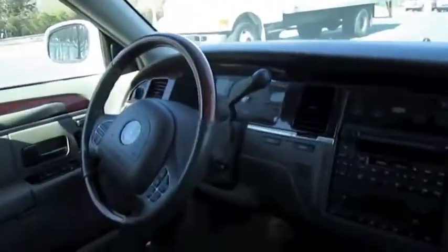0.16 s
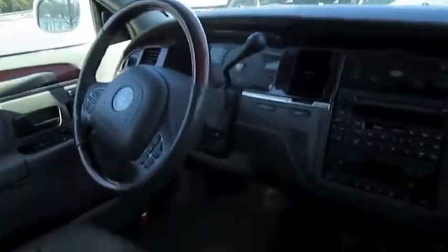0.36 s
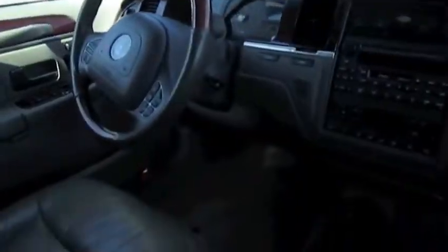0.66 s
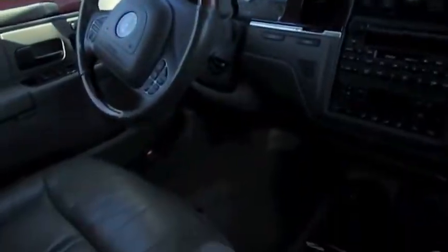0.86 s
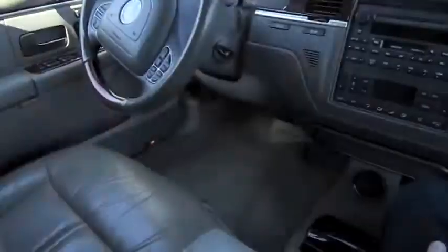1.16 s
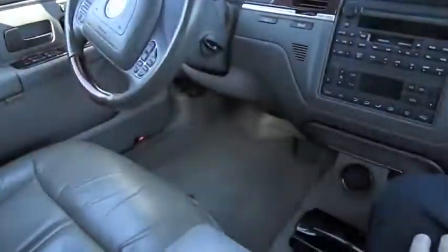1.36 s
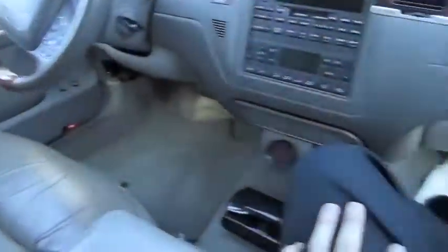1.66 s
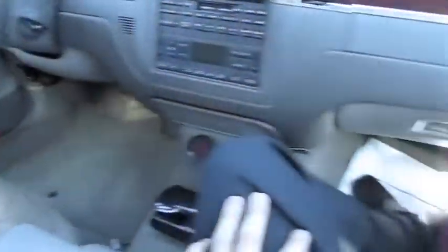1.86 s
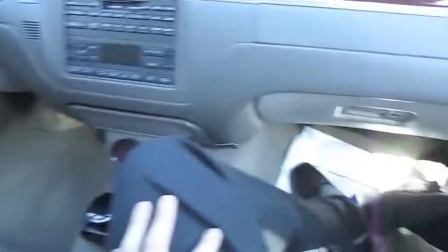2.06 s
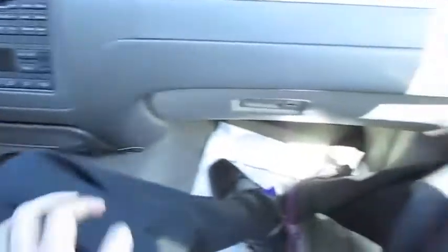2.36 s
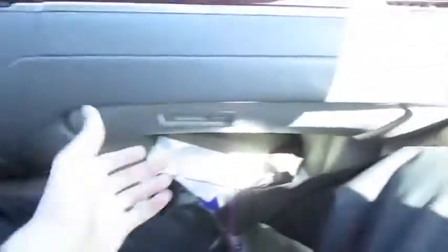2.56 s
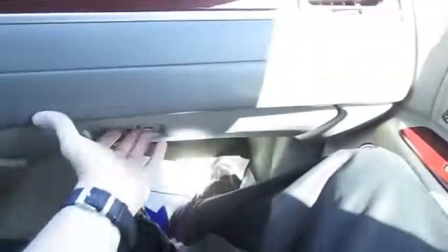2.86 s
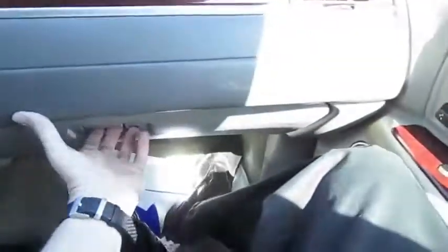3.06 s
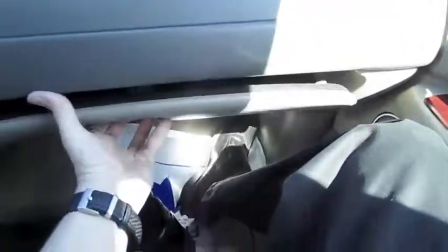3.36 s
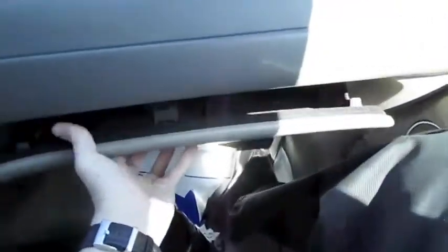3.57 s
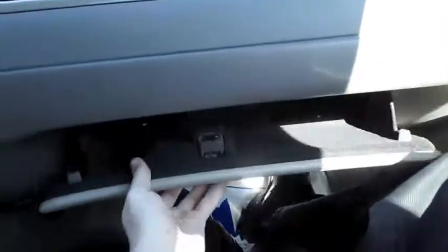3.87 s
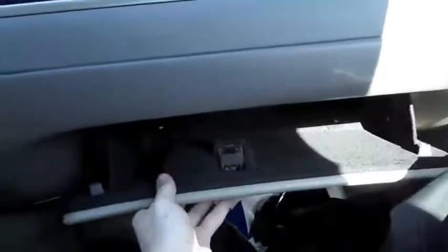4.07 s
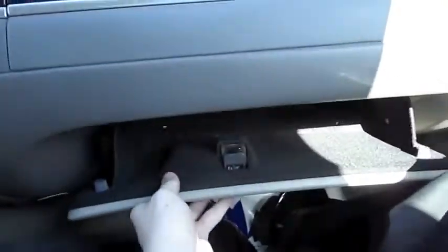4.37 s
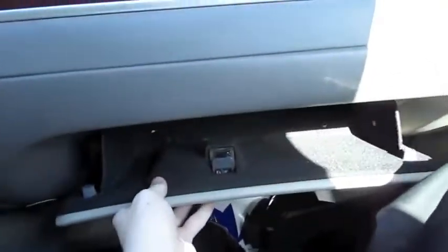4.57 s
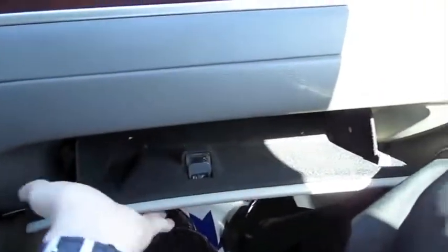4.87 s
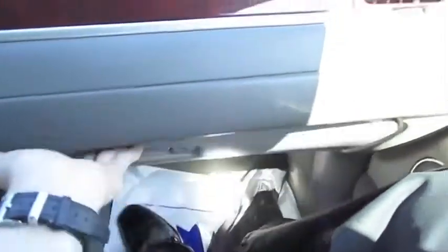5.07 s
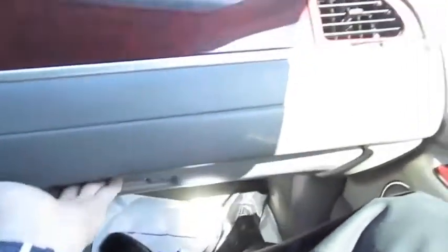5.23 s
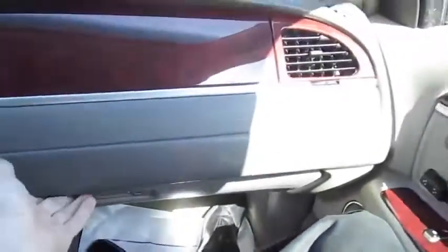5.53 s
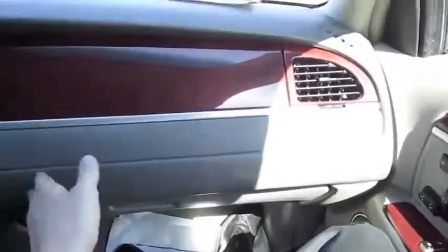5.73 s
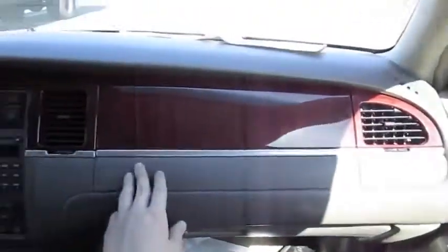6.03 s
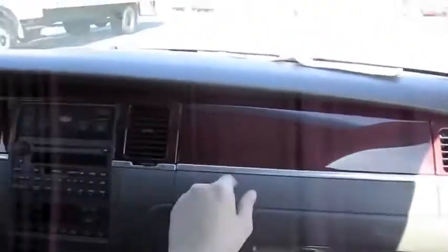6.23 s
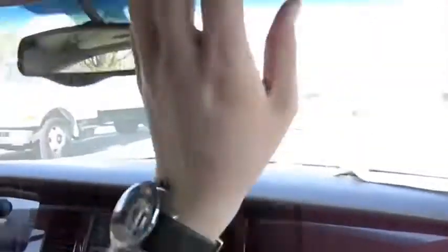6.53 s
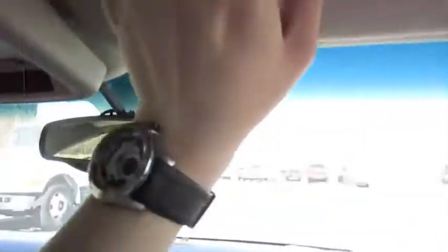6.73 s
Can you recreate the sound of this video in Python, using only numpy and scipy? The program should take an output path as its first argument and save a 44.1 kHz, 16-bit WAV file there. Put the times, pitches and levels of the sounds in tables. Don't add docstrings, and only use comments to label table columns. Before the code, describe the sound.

Close hand-held microphone in a parked car: constant deep hum, two hard clicks, a blink of near silence, sleeve rustle and soft bumps. A scratchy stick-slip scrape rises into a hard plastic pop as the glovebox opens. Small trim ticks and palm rubbing lead to the loudest event, a boomy slam that shakes the dashboard. The background ducks, then recovers beneath dry strap creaks and handling bumps.

```python
import sys
import numpy as np
from scipy import signal
from scipy.fft import rfft, irfft
from scipy.io import wavfile

SR = 44100
rng = np.random.default_rng(int(sys.argv[2]) if len(sys.argv) > 2 else 0)


def convert_level_to_amplitude(level_db):
    exponent = np.asarray(level_db, float) / 20
    return 10 ** exponent


def output_pcm(signal):
    pcm = np.clip(np.atleast_2d(signal).T, -1, 1) * 32767
    wavfile.write(sys.argv[1], SR, np.round(pcm).astype(np.int16))


N = 304290

# [time_s, level_db, octave_rel_db]
DRONE_LEVELS = [(0.05, -26, -16.5), (0.2, -24, -16.5), (0.5, -27, -12), (0.8, -26, -15.5),
                (0.97, -29.5, -13.5), (1.2, -30, -14.5), (1.36, -27.5, -38), (1.8, -28.5, -22),
                (2.47, -27, -23.5), (2.9, -28.5, -21), (3.27, -29.5, -19), (4.0, -29, -21),
                (4.7, -27.5, -19.5), (5.1, -26.5, -23), (5.6, -30, -8.5), (6.15, -26, -23.5),
                (6.6, -29.5, -15.5), (6.9, -30.5, -15)]
# [time_s, firing_hz]
MOTOR_SPEED = [(0, 72.6), (1.24, 72.5), (1.3, 71.9), (2.4, 71.9), (3.3, 71.2), (5, 70.7), (6, 70.1),
               (6.9, 70)]
# [ratio_to_firing_hz, level_rel_db]
SIDE_BANDS = [(0.502, -36.5), (1.5, -36.5), (2.368, -31), (3.05, -32), (4, -43), (4.65, -36)]
SIDE_FADE_DB_PER_S = -2

# [rest_db, effort_share, ducking_share, jolt_db, jolt_t60_s]
CABIN_LAYERS = [
    (-49, .1, 0.28, -29, .5),
    (-54.5, .2, 1, -31.5, 0.35),
    (-60.5, 0.88, 1, -43, 0.36),
    (-66.5, 0.6, 0.93, -60, 0.33),
]
# [freq_hz, level_db]
SWAY_SPECTRUM = [(10, -21), (20, 14.5), (35, 4), (50, 19), (60, -1.5), (80, -19)]
# [freq_hz, level_db]
RUMBLE_SPECTRUM = [(60, -27), (90, 12), (120, 10.5), (170, 5), (300, -1), (500, -5.5), (1000, -20.5)]
# [freq_hz, level_db]
CLOTH_SPECTRUM = [(250, -17), (500, -1), (900, -0.5), (1500, -4.5), (2500, -8.5), (4000, -14.5),
                  (7000, -39)]
# [freq_hz, level_db]
SWISH_SPECTRUM = [(1500, -6.5), (3000, -1), (5000, 0.5), (7000, -2), (9000, -4.5), (12000, -9),
                  (15000, -12.5), (17000, -23.5)]
# [time_s, effort_db]
HAND_EFFORT = [(0, 0.5), (1.35, 0.5), (1.66, 9), (2.3, 9), (2.57, 7.5), (2.87, 13), (3.0, 11), (3.4, 11.5),
               (3.7, 4), (4.08, 8), (4.3, 1.5), (4.55, 2.5), (4.86, 0.5), (5.1, 4.5), (5.8, 3.5), (6.27, 4),
               (6.76, 11.5), (6.9, 7)]
# [start_s, depth_db, fall_s, hold_s, recovery_s]
DUCKS = [
    (3.275, -7.5, 0.097, 0.17, 0.21),
    (5.14, -13, 0.035, 0.32, 0.59),
]

# [start_s, peak_db, contact_ring_db]
SWITCH_CLICKS = [
    (0.5815, -10.5, -34),
    (0.8262, -12.5, -11.5),
]
# [freq_hz, level_db, t60_s]
SWITCH_MODES = [(1600, 3, 0.015), (2800, 12, 0.0059), (3120, 9, 0.003), (5060, 11.5, 0.0042),
                (5600, 9.5, 0.0056), (6980, 0.5, 0.0057)]
# [freq_hz, level_db, t60_s]
CONTACT_MODES = [(7940, 12.5, 0.0028), (10360, 4.5, 0.0047), (13800, 2, 0.0038)]
CASING_ECHO_GAIN, CASING_ECHO_S = 0.8, 0.000242

# [start_s, length_s, peak_db, centre_hz, breadth_octaves]
STROKES = [(2.24, 0.3, -56, 7300, 1.3), (2.47, 0.083, -49, 4900, 1.16), (5.02, 0.085, -62, 11200, 0.49),
           (5.09, 0.048, -61.5, 9000, .9), (5.06, 0.042, -56.5, 2880, 0.55), (5.066, 0.1, -50, 900, 0.91),
           (6.69, 0.11, -56.5, 7260, .43), (6.77, 0.14, -51.5, 6800, 0.76)]
# [start_s, length_s, peak_db, centre_hz, breadth_octaves]
RUBS = [(1.33, 0.31, -51.5, 228, 0.69), (3.314, 0.056, -36.5, 190, 0.6), (4.186, 0.048, -51, 580, .6),
        (4.299, 0.075, -57, 640, 0.39), (4.424, .09, -52, 605, 0.87), (4.514, 0.095, -51.5, 600, 1),
        (4.917, 0.041, -50, 600, 0.94), (6.498, 0.077, -53, 700, 1.5), (6.599, 0.33, -52.5, 262, 0.88)]
# [start_s, length_s, peak_db, centre_hz, breadth_octaves]
NOISE_BURSTS = [(3.187, .016, -46, 11000, .7), (3.205, 0.019, -46, 11000, 0.64), (3.288, 0.019, -46, 8000, .7),
                (5.196, 0.042, -48, 1100, 0.8), (5.266, 0.029, -51.5, 1500, 0.81),
                (6.213, 0.013, -44.5, 1310, 1), (3.745, .012, -60, 9000, .8), (4.135, 0.044, -62, 8000, .8),
                (3.25, .02, -56, 9000, .8), (3.315, .02, -58, 5000, .9), (3.43, .012, -56, 4000, .6),
                (6.518, .012, -52, 5000, .9), (6.21, .008, -56, 4500, .6)]
STROKE_SKEW, STROKE_SOFTNESS, SINK_OCTAVES = 0.99, 0.74, 0.27

# [start_s, length_s, level_db, from_hz, to_hz]
OUTSIDE_ENGINE = (1.4, 0.65, -43.5, 118, 107.5)

# [start_s, peak_db, ring_hz]
KNOCKS = [(2.036, -30.5, 346), (2.365, -31, 376), (2.465, -32.5, 334), (2.746, -38, 910),
          (2.999, -32, 1450), (3.212, -26, 1300), (3.418, -34, 1250), (3.431, -19.5, 523),
          (3.434, -28.5, 785), (3.439, -53, 1100), (3.773, -33, 553), (4.13, -20.5, 746), (4.21, -37, 510),
          (4.93, -38, 725), (3.351, -38, 203), (5.228, -31, 298), (5.682, -45, 338), (5.966, -32, 353),
          (6.213, -34.5, 800), (6.422, -45, 503), (6.541, -35, 366), (6.73, -33.5, 337)]
KNOCK_CYCLES, KNOCK_MIN_T60_S = 15.3, 0.044

# [time_s, pressure_db]
DRAG_PRESSURE = [(2.92, -55), (2.971, -48), (3.02, -39), (3.05, -39), (3.1, -36), (3.15, -37.5),
                 (3.171, -38), (3.185, -54.5)]
# [freq_hz, width_hz, level_db]
LATCH_RESONANCES = [(562, 140, -35.5), (853, 49, -1.5), (1260, 150, -14.5), (1520, 680, 6.5),
                    (2000, 400, 8), (2445, 190, -7), (3260, 300, -8.5)]
# [freq_hz, level_db]
EDGE_SPECTRUM = [(1200, -30), (2900, 7.5), (3800, 3.5), (4800, -3), (5800, -3.5), (7000, -7), (10000, -7),
                 (16000, -20)]
# [peak_s, level_db, half_length_s]
LAST_SLIPS = [
    (3.195, -43, 0.0048),
    (3.217, -34, 0.015),
    (3.263, -37.5, 0.0056),
]
RASP_DB, RASP_DB_PER_S = -12.5, 39.5
BENT_STRETCH, BEND_FROM_S, BEND_TO_S = 1.3, 3.08, 3.13

# [start_s, length_s, level_db, from_hz, to_hz]
CHATTER = [(3.02, 0.053, -46, 2100, 2070), (3.064, 0.036, -38, 2080, 2090), (3.078, 0.017, -44, 790, 930),
           (3.05, .04, -47, 1350, 1600), (3.097, 0.045, -43, 1440, 1420), (3.11, 0.023, -40, 2150, 2200),
           (3.128, 0.025, -40, 1530, 1300), (3.13, 0.019, -42, 1600, 2500), (3.145, 0.032, -41, 2700, 1900),
           (3.092, 0.026, -47, 3750, 3620), (3.12, 0.036, -46, 4200, 3420), (3.122, 0.05, -52, 5850, 5800),
           (3.162, 0.023, -43, 1700, 1400), (3.188, .014, -47, 4760, 3780), (3.188, 0.045, -54, 5850, 5400),
           (3.206, 0.021, -52, 4300, 4300), (3.249, .016, -52, 4250, 4200), (3.256, .01, -49, 5700, 5200),
           (3.256, .009, -42, 1500, 1270), (3.194, 0.013, -47, 1940, 2080)]
CHATTER_WIDTH_HZ, CHATTER_SLIPS_PER_S = 420, 2500

# [start_s, peak_db, ring_hz]
TICKS = [(3.0847, -34, 2140), (3.2105, -27, 1400), (3.217, -26, 1520), (3.261, -28, 1520),
         (3.369, -52, 1930), (3.4295, -33, 1940), (3.67, -36.5, 1990), (3.927, -35, 2100),
         (3.9796, -46, 2430), (4.0213, -55, 1410), (4.0733, -47, 1420), (4.138, -43, 1300),
         (4.17, -46, 1450), (5.197, -40, 1580), (5.2588, -58, 4160), (6.2118, -32, 1460),
         (6.5226, -44, 3360), (6.709, -41, 1260)]
# [start_s, peak_db, ring_hz]
CRACKS = [(3.2505, -34, 1090), (3.599, -48.5, 1550), (3.634, -53, 1360), (3.7758, -50, 2020),
          (4.4687, -46, 1170), (4.5415, -49, 1230), (4.5723, -47, 1250), (4.9825, -49.5, 4700)]
TICK_EDGE_DB, CRACK_EDGE_DB = -12.5, -4
FAINT_T60_S, T60_DB_PER_DB = 0.027, -0.37

# [start_s, peak_db, freq_hz, t60_s]
PINGS = [(3.296, -29, 3380, .03), (3.299, -30, 1880, 0.045), (3.312, -35, 1600, 0.027),
         (3.312, -35, 2880, 0.033), (3.367, -48, 2000, .02), (3.2165, -27, 1520, .03),
         (3.251, -33, 1070, .02), (3.284, -22, 205, .12), (3.4295, -30, 1950, .035), (4.13, -33, 520, .05),
         (4.131, -38, 1300, .03), (3.431, -41, 4900, .02), (3.431, -35, 2650, 0.017),
         (3.67, -47, 6070, .015), (3.6705, -46, 8800, 0.018), (3.776, -50, 5900, .025),
         (3.776, -48, 3900, .02), (3.704, -54, 5200, .025), (3.809, -52, 4700, .02),
         (3.927, -47, 4000, .03), (3.926, -48, 7300, .02), (4.136, -50, 5200, .03), (4.074, -54, 5500, .02),
         (5.139, -18.5, 2140, .03), (5.14, -23, 5700, .06), (5.149, -32.5, 4790, 0.068),
         (5.151, -26, 1218, 0.1), (5.152, -22, 3340, .06), (5.165, -27, 675, 0.13),
         (5.268, -50, 6300, .015), (5.2685, -42, 1500, .03), (5.964, -45, 1400, 0.024),
         (6.5215, -41, 3450, .02), (6.237, -48, 2400, .02), (6.131, -43, 2300, .02),
         (6.0783, -45, 2380, .02), (6.104, -45, 1800, .02)]

# [start_s, rattle_db, thud_db, thud_hz, t60_s]
RELEASE_BLOWS = [(3.279, -54.5, -21, 175, 0.037), (3.283, -14, -18.5, 300, 0.026),
                 (3.286, -18.5, -40.5, 258, 0.0067), (3.2895, -24, -13, 461, 0.0063),
                 (3.299, -26, -24.5, 145, 0.015), (3.311, -35, -17.5, 108, 0.016)]
# [freq_hz, level_db]
RELEASE_SPECTRUM = [(300, 9.5), (600, -5.5), (1000, -12), (1600, -16.5), (2000, 0.5), (3000, -4),
                    (4550, -4), (6500, -5.5), (8500, -12.5), (12000, -17), (16000, -30)]
# [start_s, rattle_db, thud_db, thud_hz, t60_s]
SLAM_BLOWS = [(5.1387, -8.5, -5.5, 234, 0.037), (5.1445, -14.5, -13, 500, 0.06),
              (5.151, -8, -3, 144, 0.042), (5.157, -18, -19, 704, 0.045), (5.1635, -43, -10.5, 173, 0.026),
              (5.172, -34, -31, 390, 0.045), (5.2, -44, -35, 242, 0.11), (5.267, -48.5, -58, 290, 0.12)]
# [freq_hz, level_db]
SLAM_SPECTRUM = [(300, -6), (500, -10), (700, -3.5), (1050, -12.5), (1400, -9.5), (2200, -14),
                 (3300, -22.5), (4700, -25.5), (5770, -20.5), (7000, -24), (10000, -31.5), (16000, -46)]
# [freq_hz, level_db, t60_s]
LID_MODES = [(28.4, -23, .25), (40.1, -13, 0.13), (97, 2, 0.023), (144, 9, 0.024), (234, 11, 0.025),
             (290, -8, 0.061), (405, -4, 0.037), (500, -9, 0.09), (564, -14, .06), (709, -13, .06),
             (983, -14, .06)]
# [freq_hz, level_db, t60_s]
SPRING_MODES = [(1560, 3, 0.0082), (1950, -11.5, 0.024), (4600, -1.5, 0.0081), (537, -15, 0.029),
                (8200, -1.5, 0.0037), (5560, -37, 0.0094)]
SPRING_START_S = 3.2834

# [start_s, length_s, level_db, from_hz, to_hz]
SQUEAKS = [(3.852, 0.11, -74, 9620, 9250), (4.005, .05, -75, 11500, 11300), (4.13, .06, -77, 10900, 10700),
           (3.86, .06, -78, 8250, 8200)]
# [start_s, peak_db, freq_hz, t60_s]
WOBBLE = [
    (5.222, -26, 33, .25),
    (5.321, -28.5, 23.6, .8),
]
# [start_s, peak_db]
CREAKS = [(5.907, -55), (5.928, -52), (5.945, -45), (5.9737, -45), (6.0008, -49), (6.0207, -57),
          (6.0785, -45), (6.104, -41.5), (6.131, -45), (6.2034, -47), (6.237, -46), (6.2532, -43),
          (6.369, -50), (6.411, -51), (6.4573, -43), (6.4822, -51)]
# [freq_hz, level_db]
STRAP_SPECTRUM = [(1000, -22), (1350, 8.5), (2500, 1), (3600, 0), (4600, -12), (6500, -11), (10000, -28)]
STRAP_T60_S = 0.011

ECHO_DB, ECHO_T60_S, ECHO_LOWPASS_HZ = -17, 0.1, 2500
DROPOUT_FROM_S, DROPOUT_TO_S, LEAK_DB = 1.2405, 1.302, -36
BAND_LIMIT_HZ = 15900


def evened(x):
    return x / np.sqrt(np.mean(x ** 2) + 1e-20)


def played(curve):
    time_s, *columns = np.transpose(curve)
    return [np.interp(np.arange(N) / SR, time_s, c) for c in columns]


def coloured(x, spectrum):
    f, db = np.transpose(spectrum)
    hz = np.fft.rfftfreq(len(x), 1 / SR) + 1
    gain = convert_level_to_amplitude(np.interp(np.log(hz), np.log(f), db, -90, -90))
    return irfft(rfft(x) * gain, len(x))


def slow(hz):
    lowpass = signal.butter(2, hz, fs=SR, output="sos")
    return evened(signal.sosfilt(lowpass, rng.standard_normal(N + SR))[SR:])


def progress(length_s):
    return np.arange(0, 1, 1 / (length_s * SR))


def ring(hz, t60_s, size):
    t = np.arange(size) / SR
    return convert_level_to_amplitude(-60 * t / np.maximum(t60_s, 0.002)) * np.sin(2 * np.pi * hz * t)


def modes(table, size=3000):
    return sum(convert_level_to_amplitude(db) * ring(hz, t60_s, size) for hz, db, t60_s in table)


def add(mix, start_s, sound):
    part = mix[round(start_s * SR):][:len(sound)]
    part += sound[:len(part)]


def ducking():
    t, gain_db = np.arange(N) / SR, np.zeros(N)
    for s, depth_db, fall_s, hold_s, recovery_s in DUCKS:
        recovery = np.exp(-np.maximum(t - s - hold_s, 0) / recovery_s)
        gain_db += depth_db * np.clip((t - s) / fall_s, 0, 1) * recovery
    return gain_db


def drone():
    t = np.arange(N) / SR
    db, octave_db = played(DRONE_LEVELS)
    db = db + ducking()
    firing_hz = played(MOTOR_SPEED)[0] + 0.18 * slow(4.5)
    turn = 2 * np.pi * np.cumsum(firing_hz) / SR
    out = convert_level_to_amplitude(db + 0.5 * slow(28)) * np.sin(turn)
    out += convert_level_to_amplitude(db + octave_db + slow(7.3)) * np.cos(2 * turn + 0.23 * slow(3.5))
    for order, rel_db in SIDE_BANDS:
        order_db = db + rel_db + 2 + SIDE_FADE_DB_PER_S * t + 3 * slow(4.9)
        out += convert_level_to_amplitude(order_db) * np.sin(order * turn + 1.3 * slow(6))
    return np.sqrt(2) * out


def cabin():
    out, t = np.zeros(N), np.arange(N) / SR
    effort_db, duck_db = played(HAND_EFFORT)[0], ducking()
    # spectrum, level band from_hz, to_hz, lump depth_db, lump rate_hz
    layers = [(SWAY_SPECTRUM, 18, 55, 1.1, 5), (RUMBLE_SPECTRUM, 170, 450, 2.2, 25),
              (CLOTH_SPECTRUM, 600, 2800, 1.8, 60), (SWISH_SPECTRUM, 4500, 13000, 1.1, 80)]
    for levels, (spectrum, lo_hz, hi_hz, lump_db, lump_hz) in zip(CABIN_LAYERS, layers):
        rest_db, follow, ducked, jolt_db, t60_s = levels
        noise = coloured(rng.standard_normal(N) * convert_level_to_amplitude(lump_db * slow(lump_hz)), spectrum)
        bandpass = signal.butter(2, [lo_hz, hi_hz], "band", fs=SR, output="sos")
        band = signal.sosfilt(bandpass, noise)
        jolt = np.zeros(N)
        for s, depth_db, *_ in DUCKS:
            jolt += (t > s) * convert_level_to_amplitude(jolt_db - 0.58 * (depth_db + 10.5) - 60 * abs(t - s) / t60_s)
        steady = convert_level_to_amplitude(rest_db + follow * effort_db + ducked * duck_db)
        out += np.hypot(steady, jolt) * noise / np.std(band)
    return out


def switch():
    out, t = np.zeros(N), np.arange(3000) / SR
    snap = modes(SWITCH_MODES) * np.minimum(t / 0.0005, 1)
    snap = snap + CASING_ECHO_GAIN * np.interp(t - CASING_ECHO_S, t, snap)
    snap = snap / abs(snap).max()
    contact = modes(CONTACT_MODES) * np.minimum(t / 0.00048, 1)
    for s, db, contact_db in SWITCH_CLICKS:
        add(out, s, -convert_level_to_amplitude(db - 5.5) * (snap + convert_level_to_amplitude(contact_db) * contact))
    return out


def rubbing(strokes):
    out = np.zeros(N)
    for s, length_s, db, centre_hz, octaves in strokes:
        hz, at_s, z = signal.stft(rng.standard_normal(SR // 2), SR, nperseg=512)
        away = np.log2((hz[:, None] + 1) / centre_hz) + SINK_OCTAVES * at_s / length_s
        u = progress(length_s)
        hiss = signal.istft(z * np.exp(-(away / octaves) ** 2), SR, nperseg=512)[1][:len(u)]
        swell = abs(np.sin(np.pi * u ** STROKE_SKEW)) ** STROKE_SOFTNESS
        add(out, s, convert_level_to_amplitude(db + 1.1 * slow(70)[:len(u)]) * swell * evened(hiss))
    return out


def outside_engine():
    out = np.zeros(N)
    s, length_s, db, from_hz, to_hz = OUTSIDE_ENGINE
    u = progress(length_s)
    hz = from_hz + (to_hz - from_hz) * u + 2.92 * slow(8.4)[:len(u)]
    turn = 2 * np.pi * np.cumsum(hz) / SR
    note = np.sin(turn) + convert_level_to_amplitude(-11) * np.sin(2 * turn) + convert_level_to_amplitude(-16) * np.sin(3 * turn)
    add(out, s, convert_level_to_amplitude(db + 2 * slow(8.6)[:len(u)]) * np.sin(np.pi * u) ** 0.5 * note)
    return out


def knocks():
    out, t = np.zeros(N), np.arange(3000) / SR
    for s, db, hz in KNOCKS:
        t60_s = max(KNOCK_CYCLES / hz, KNOCK_MIN_T60_S)
        spectrum = [(0.099 * hz, -20), (0.2 * hz, -3), (hz, 0), (1.4 * hz, -8), (5 * hz, -26)]
        body = evened(coloured(rng.standard_normal(3000), spectrum)) * convert_level_to_amplitude(-45 * t / t60_s)
        pair = ring(hz, t60_s, 3000) + 0.35 * ring(1.7 * hz, 0.5 * t60_s, 3000)
        add(out, s, convert_level_to_amplitude(db) * (0.62 * pair + 0.31 * body) * np.minimum(t / 0.0015, 1))
    return out


def latch_ringing(slips, stretch):
    response = np.zeros(1500)
    for hz, width_hz, db in LATCH_RESONANCES:
        t60_s = 3 / (0.92 * stretch * width_hz)
        response += convert_level_to_amplitude(db) * np.sqrt(width_hz) * ring(stretch * hz, t60_s, 1500)
    return evened(signal.oaconvolve(slips, response)[:N])


def scrape():
    t = np.arange(N) / SR
    start_s, end_s = DRAG_PRESSURE[0][0], DRAG_PRESSURE[-1][0]
    strength = convert_level_to_amplitude(2.2 * rng.exponential(1, N).clip(0, 4)) * rng.standard_normal(N)
    slips = strength * (rng.random(N) < 5000 / SR)
    slips *= convert_level_to_amplitude(2 * slow(131) + 1.3 * slow(35))
    flat, bent = latch_ringing(slips, 1), latch_ringing(slips, BENT_STRETCH)
    rasp = evened(coloured(np.tanh(slips), EDGE_SPECTRUM))
    rasp *= convert_level_to_amplitude(RASP_DB + RASP_DB_PER_S * np.clip(t - start_s, 0, 0.25))
    drag = convert_level_to_amplitude(played(DRAG_PRESSURE)[0]) * np.clip((t - start_s) / 0.019, 0, 1) * (t < end_s)
    jerks = sum(convert_level_to_amplitude(db) * np.exp(-abs(t - s) / half_s) for s, db, half_s in LAST_SLIPS)
    bend = np.interp(t, [BEND_FROM_S, BEND_TO_S], [0, np.pi / 2])
    return (drag + jerks) * (np.cos(bend) * flat + np.sin(bend) * bent + rasp)


def chatter():
    out = np.zeros(N)
    r = np.exp(-np.pi * CHATTER_WIDTH_HZ / SR)
    for s, length_s, db, from_hz, to_hz in CHATTER:
        u = np.arange(4000) / (length_s * SR)
        hit, size = rng.random((2, 4000))
        slips = (hit < CHATTER_SLIPS_PER_S / SR) * (2 * size - 1)
        slips = slips * np.sin(np.pi * u.clip(0, 1)) ** 0.5
        hz = from_hz + (to_hz - from_hz) * u.clip(0, 1)
        turn = np.exp(2j * np.pi * np.cumsum(hz) / SR)
        rung = evened((turn * signal.lfilter([1], [1, -2 * r, r * r], slips / turn)).real)
        add(out, s, convert_level_to_amplitude(db) * rung / rung[:round(length_s * SR)].std())
    return out


def ticks():
    out, t = np.zeros(N), np.arange(3000) / SR
    edge_spectrum = [(2500, -21), (4000, 0.5), (6000, -5.5), (10000, -14), (16000, -22.5)]
    rows = [(*r, TICK_EDGE_DB) for r in TICKS] + [(*r, CRACK_EDGE_DB) for r in CRACKS]
    for s, db, hz, edge_db in rows:
        t60_s = FAINT_T60_S * convert_level_to_amplitude(T60_DB_PER_DB * (db + 46.5))
        body_spectrum = [(0.099 * hz, -25), (hz, 0), (1.68 * hz, -6), (6.6 * hz, -22)]
        body = evened(coloured(rng.standard_normal(3000), body_spectrum))
        edge = evened(coloured(rng.standard_normal(3000), edge_spectrum))
        burst = (0.5 * body + convert_level_to_amplitude(edge_db) * edge) * convert_level_to_amplitude(-60 * t / max(t60_s, 0.002))
        add(out, s, convert_level_to_amplitude(db) * (0.5 * ring(hz, t60_s, 3000) + burst))
    return out


def pings():
    out, attack = np.zeros(N), np.minimum(np.arange(8000) / (0.0006 * SR), 1)
    for s, db, hz, t60_s in PINGS:
        add(out, s, convert_level_to_amplitude(db) * ring(hz, t60_s, 8000) * attack)
    return out


def bang(blows, spectrum, lid_db):
    out, t = np.zeros(N), np.arange(24000) / SR
    lid = convert_level_to_amplitude(lid_db) * modes(LID_MODES, 24000)
    for k, (s, db, thud_db, thud_hz, t60_s) in enumerate(blows):
        rattle = evened(coloured(rng.standard_normal(24000), spectrum))
        rattle *= convert_level_to_amplitude(db - 60 * t / t60_s) * np.minimum(t / 0.00045, 1)
        thud = convert_level_to_amplitude(thud_db) * (ring(thud_hz, 1.3 * t60_s, 24000) + lid) * np.minimum(t / 0.002, 1)
        add(out, s, rattle - (-1) ** k * thud)
    return out


def latch_spring():
    out, t = np.zeros(N), np.arange(3000) / SR
    add(out, SPRING_START_S, modes(SPRING_MODES) * np.minimum(t / 0.0014, 1))
    return out


def squeaks():
    out = np.zeros(N)
    for s, length_s, db, from_hz, to_hz in SQUEAKS:
        u = progress(length_s)
        hz = from_hz + (to_hz - from_hz) * u + 90 * slow(150)[:len(u)]
        tone = np.sin(2 * np.pi * np.cumsum(hz) / SR)
        add(out, s, convert_level_to_amplitude(db + 4 * slow(60)[:len(u)]) * np.sin(np.pi * u) ** 0.5 * tone)
    return out


def dashboard_wobble():
    out = np.zeros(N)
    for s, db, hz, t60_s in WOBBLE:
        add(out, s, convert_level_to_amplitude(db) * ring(hz, t60_s, SR))
    return out


def strap_creaks():
    out, t = np.zeros(N), np.arange(1500) / SR
    for s, db in CREAKS:
        burst = evened(coloured(rng.standard_normal(1500), STRAP_SPECTRUM))
        add(out, s, convert_level_to_amplitude(db - 60 * t / STRAP_T60_S) * burst)
    return out


def echoes(x):
    t = np.arange(6000) / SR
    scatter = rng.standard_normal(6000) * convert_level_to_amplitude(-60 * t / ECHO_T60_S) * (t > 0.003)
    scatter = signal.lfilter(*signal.butter(1, ECHO_LOWPASS_HZ, fs=SR), scatter)
    return x + convert_level_to_amplitude(ECHO_DB) * signal.oaconvolve(x, scatter / np.linalg.norm(scatter))[:N]


def scene():
    hand = rubbing(STROKES + RUBS) + scrape() + squeaks() + strap_creaks()
    trim = knocks() + ticks() + latch_spring()
    release = bang(RELEASE_BLOWS, RELEASE_SPECTRUM, lid_db=-14.5)
    slam = bang(SLAM_BLOWS, SLAM_SPECTRUM, lid_db=-10.5)
    background = drone() + cabin() + outside_engine() + dashboard_wobble()
    close = switch() + chatter() + pings() + rubbing(NOISE_BURSTS)
    return (background + close + echoes(hand + trim + release + slam))[None]


def low_pass(x):
    return signal.sosfilt(signal.butter(12, 16530, fs=SR, output="sos"), x)


def record(dry):
    t = np.arange(N) / SR
    edges_s = [DROPOUT_FROM_S - 0.001, DROPOUT_FROM_S, DROPOUT_TO_S, DROPOUT_TO_S + 0.001]
    gone = np.interp(t, edges_s, [0, 1, 1, 0])
    muffled = signal.lfilter([0.03], [1, -0.97], dry)
    mix = dry * (1 - gone) + convert_level_to_amplitude(LEAK_DB) * gone * muffled
    mix = 0.77 * np.tanh(mix / 0.78)
    lowpass = signal.firwin(255, BAND_LIMIT_HZ, window=("kaiser", 8), fs=SR)
    mix = signal.oaconvolve(mix, lowpass[None], "same")
    return low_pass(mix)


dry = scene()
out = record(dry)
output_pcm(out)
```